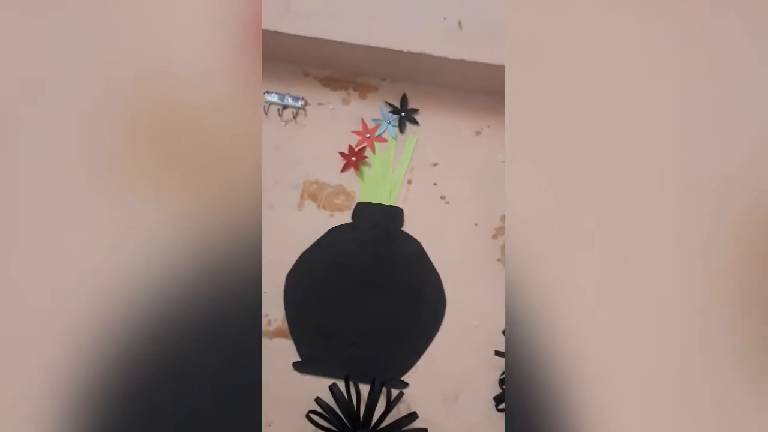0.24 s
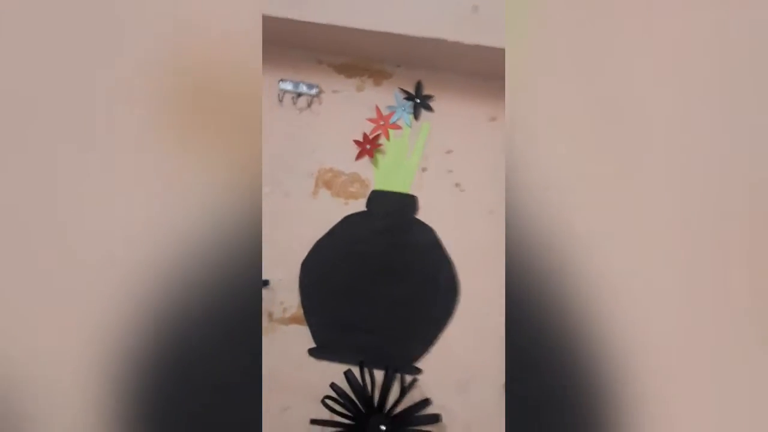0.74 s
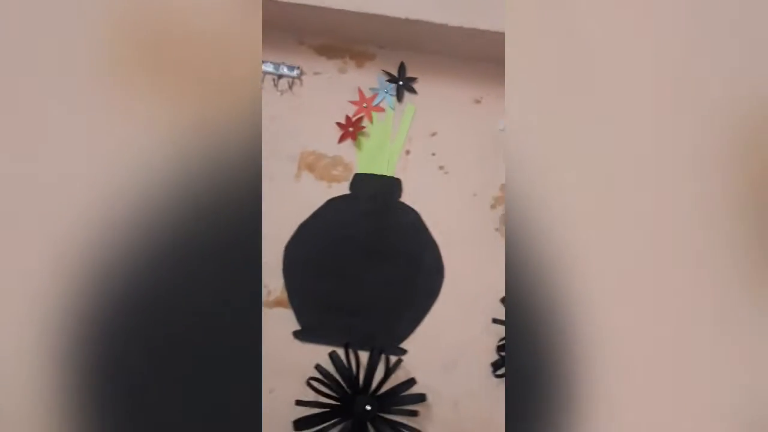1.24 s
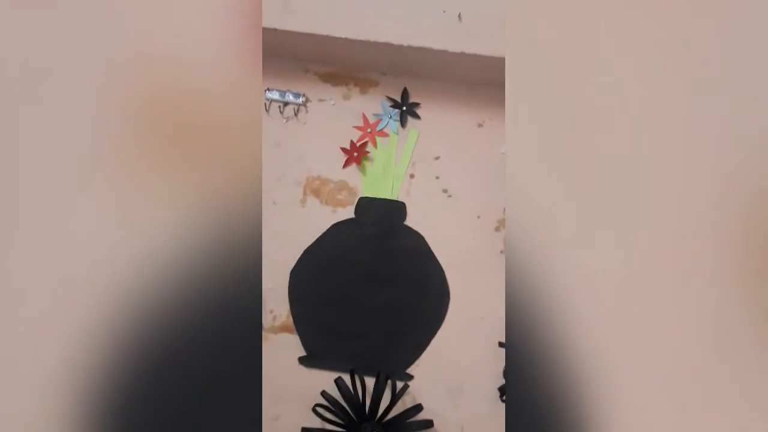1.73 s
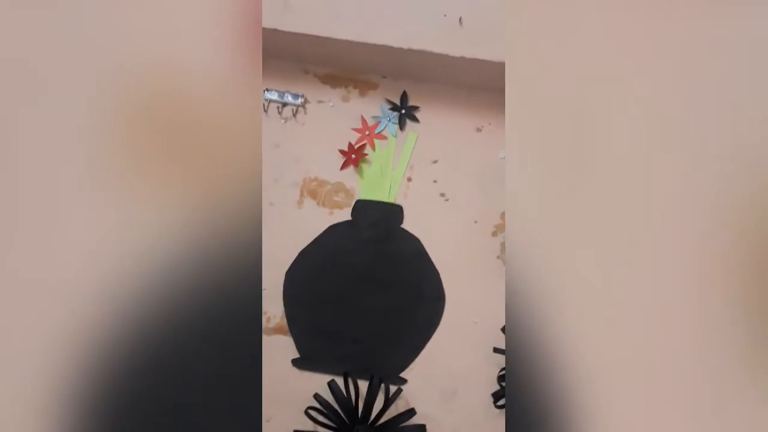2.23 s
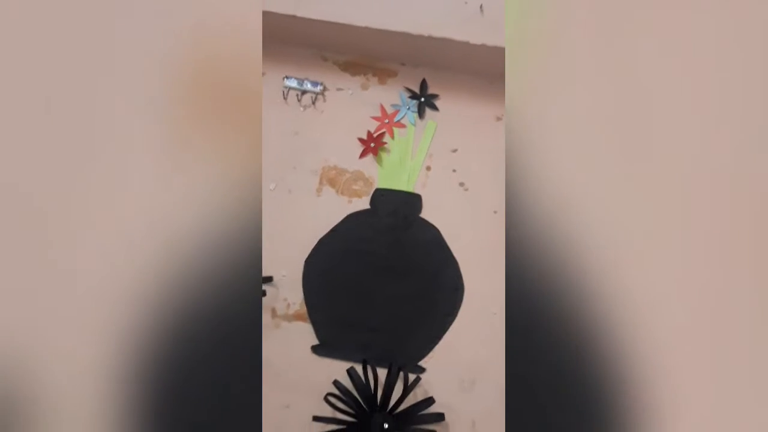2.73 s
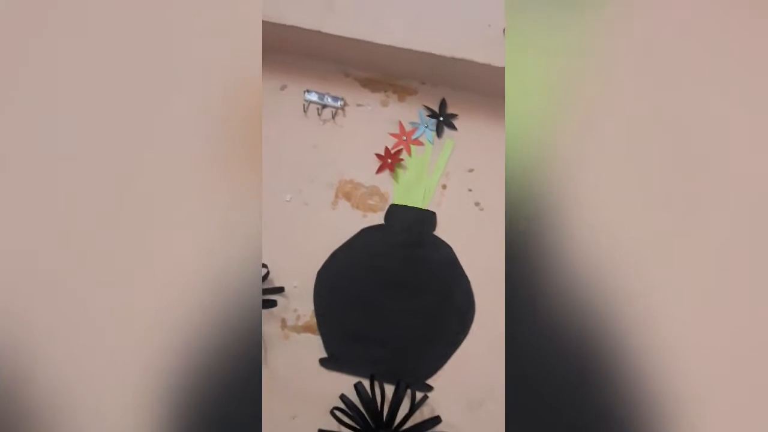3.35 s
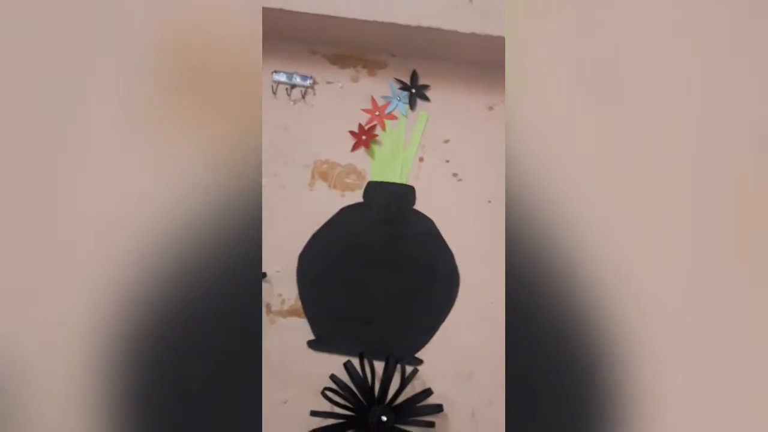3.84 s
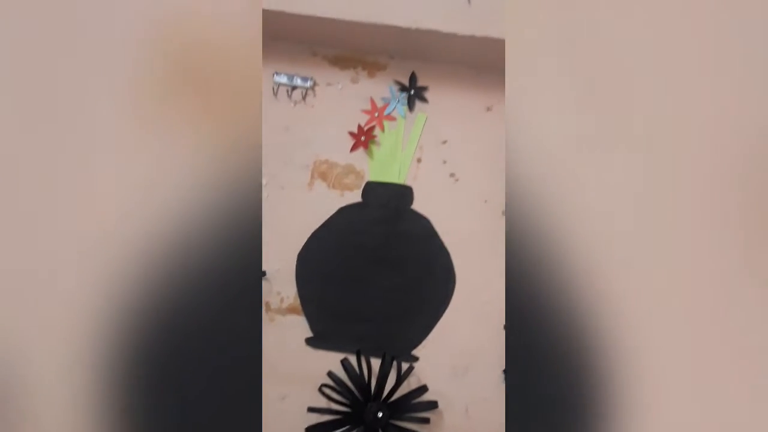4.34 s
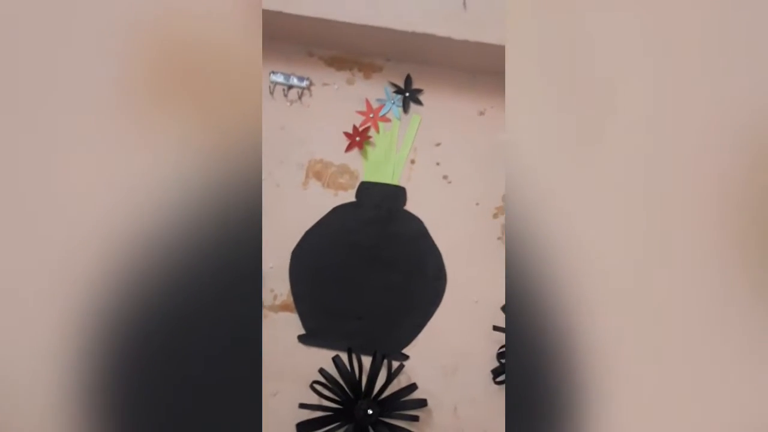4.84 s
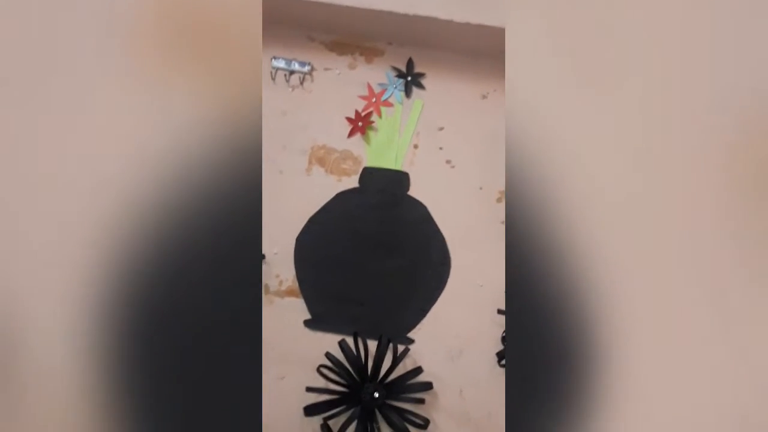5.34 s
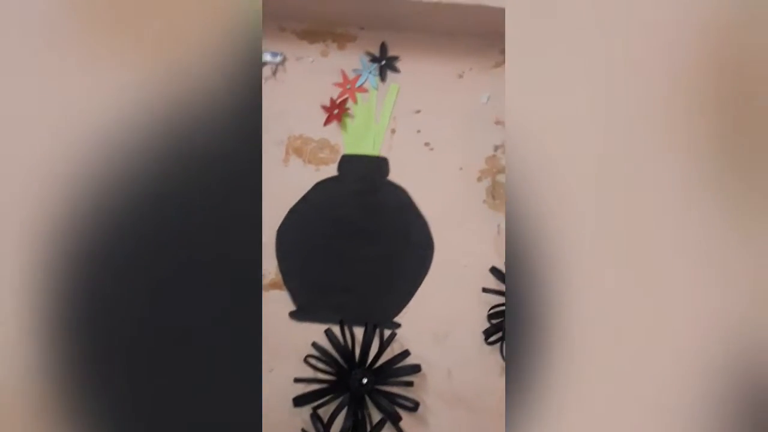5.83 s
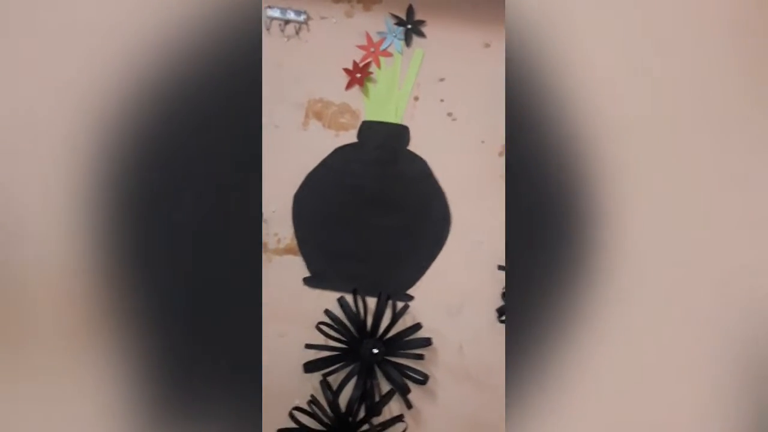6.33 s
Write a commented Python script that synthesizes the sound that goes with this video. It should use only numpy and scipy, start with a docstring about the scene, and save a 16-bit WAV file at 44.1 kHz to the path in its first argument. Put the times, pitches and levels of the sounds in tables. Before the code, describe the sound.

In a quiet room, faint fabric rustling gives way to a click and six loud, close knocks on a hard surface.

```python
"""Six knocks in a bare room

Six sharp knocks hit a hard panel close to a hand-held microphone. Each one cracks, thuds and
sets the small room ringing. Soft swishes, as of cloth, dull bumps and light clicks come mostly before.
The knocks overload the recorder; its gain control turns the room noise down and lets it creep back."""
import sys
import numpy as np
from scipy import signal
from scipy.fft import rfft, irfft
from scipy.io import wavfile
from scipy.ndimage import uniform_filter1d, minimum_filter1d

SR = 44100
rng = np.random.default_rng(int(sys.argv[2]) if len(sys.argv) > 2 else 0)


def master_out(mix):
    """Clip the mix to full scale and print it as 16-bit PCM to the path in sys.argv[1]."""
    frames = np.transpose(np.atleast_2d(mix))
    ceiling = np.clip(frames, -1, 1)
    pcm = np.round(ceiling * 32767).astype(np.int16)
    wavfile.write(sys.argv[1], SR, pcm)


N = 289737
FILTER_HZ = abs(np.fft.fftfreq(8192, 1 / SR))  # the frequencies at which a filter's gain is set
TIME_S = np.arange(SR) / SR  # one second of time, for short sounds

# Tone of the steady room noise: frequency_hz, level_db
ROOM_NOISE_TONE = [(15, -71), (25, -15), (59, -12.5), (92, -0.5), (120, -1.5), (285, -3), (384, -4.5),
                   (416, -4.5), (607, -5.5), (796, -11), (1790, -12), (3340, -5), (6740, -26.5),
                   (8830, -41.5), (16000, -42.5)]
# How long the room takes to fade by 60 dB: frequency_hz, fade_s
ROOM_FADE = [(60, 0.81), (160, 0.47), (420, 0.53), (1100, 0.48), (2900, 0.43), (7700, 0.39), (15000, 0.38)]
# Echoes from the nearest walls: delay_s, level_db
WALL_ECHOES = [(.0105, -19), (.0195, -18), (.0235, -19), (.0405, -22.5)]
# Dull bumps: start_s, level_db, pitch_hz, length_s
DULL_BUMPS = [(.31, -46, 196, 0.13), (.72, -45, 210, 0.063), (1.448, -48, 208.5, .09),
              (1.92, -41.5, 205.6, 0.17), (2.22, -50, 201, 0.13), (6.3, -50, 216.5, .24)]
# Light clicks: start_s, strength_db
LIGHT_CLICKS = [(.409, -26), (.6385, -24), (2.9512, -5), (4.329, -30), (5.956, -35)]
# Tone of a click: frequency_hz, level_db
CLICK_TONE = [(500, -28.5), (2000, -14.5), (3500, -3.5), (6500, -9), (8500, -13.5), (15000, -4.5)]
# Cloth strokes: start_s, swell_s, linger_s, level_db, extra_rustle_db, extra_sheen_db
CLOTH_STROKES = [(0.084, 0.075, 0.066, -36.5, -1, -1), (.335, 0.04, 0.037, -49, -31, 1.5),
                 (.44, .05, .05, -57, 5, -8), (.72, 0.047, .02, -51, -4, -2),
                 (.835, 0.073, 0.14, -32.5, -7.5, -8), (.96, 0.093, 0.05, -32.5, 1, -13),
                 (1.48, 0.13, 0.13, -34.5, -4, -12), (1.72, 0.19, 0.15, -42, 1.5, -7),
                 (1.95, 0.064, 0.013, -35, 2, -11), (2.12, 0.049, .06, -57, -13, -4),
                 (2.785, 0.088, .015, -50.5, -2, -3), (4.34, 0.071, .05, -44.5, 1, -9),
                 (4.57, 0.064, 0.039, -40.5, 1.5, -6), (5.29, 0.068, .12, -53, -1, -4),
                 (5.54, 0.036, .04, -59, -3, -3), (5.86, 0.11, 0.087, -60, -6, -8),
                 (6.392, 0.38, .05, -27, 2.5, -5.5)]
# Tone of the cloth's hiss: frequency_hz, level_db
HISS_TONE = [(1500, -16.5), (2500, -22.5), (3400, 2.5), (4300, 0.5), (5200, -3), (7000, -1.5),
             (8200, -17.5), (16000, -14.5)]
# Tone of its lower rustle: frequency_hz, level_db
RUSTLE_TONE = [(300, -9.5), (900, -18), (1500, -15), (2200, -4), (3200, 2.5), (4200, -5.5), (7000, -29.5)]
# Tone of its high sheen: frequency_hz, level_db
SHEEN_TONE = [(5000, -23.5), (7500, 0.5), (9000, -5), (12500, 3.5), (16000, -6.5)]
# Tone of a knock's crack: frequency_hz, level_db
CRACK_TONE = [(200, -50.5), (1000, -4.5), (1600, -12), (2400, -5.5), (3000, 2.5), (4200, -3), (5500, 1),
              (7000, 0.5), (8200, -14.5), (16000, -17.5)]
# Tone of a knock's reverb: frequency_hz, level_db
REVERB_TONE = [(35, -25), (75, -2.5), (150, 10.5), (300, 10.5), (560, -1.5), (850, 2), (1300, -5),
               (2200, -3.5), (3000, -1.5), (5000, -8), (6900, -4.5), (8200, -19.5), (12000, -21),
               (15500, -25)]
# Notes at which the panel and room ring: pitch_hz, strength_db, fade_s (to fall 60 dB), build_s
RINGING_NOTES = [(57.7, -13.5, 0.31, 0.064), (83.3, -0.5, 0.2, 0.15), (100.5, -6, 0.23, 0.097),
                 (139.6, -1.5, 0.29, 0.017), (161, 2.5, 0.26, 0.036), (192.2, 5.5, 0.32, 0.01),
                 (204.8, 1.5, 0.29, 0.022), (240.2, 0, 0.46, 0.0055), (330.8, -6.5, 0.25, 0.0081),
                 (359.1, -4.5, 0.33, 0.0074), (428.8, -8.5, 0.39, 0.019), (494, -23.5, 0.28, 0.0048),
                 (569, -18, 0.4, 0.0057), (629, -11.5, 0.39, 0.0043), (684, -13, 0.37, 0.0032),
                 (1012, -18.5, 0.61, 0.0019), (2242, -14.5, 0.31, 0.0041)]
# Blows on the panel, each with a second touch: start_s, force_db, snap_db, bass_db, boom_db, mid_db,
# top_db, thud_hz, treble_hz, treble_db, again_s, again_db
BLOWS = [(3.3556, 1.5, -9, 2, -22, 4.5, 2.5, 580, 4230, 2.5, .003, -14),
         (3.7279, -4, 4, 0.5, 5, -1.5, -5.5, 596, 4300, -1.5, .0018, -24),
         (4.0723, -0.5, 2, -2, 3.5, -0.5, 3, 540, 5660, -0.5, .0018, -13),
         (4.424, -2.5, 3.5, -0.5, 2.5, -2.5, 1, 495, 6530, -3.5, .002, -8),
         (4.744, 1.5, 3.5, -4.5, 0.5, -4.5, -1, 470, 5760, -2.5, .0019, -11.5),
         (5.0697, 1.5, 1.5, -2, 4, -3.5, -1.5, 454, 3660, 2.5, .0021, -8)]


def amp(db):
    """Turns decibels into a gain."""
    return 10 ** (np.asarray(db) / 20)


def evened(x):
    """Scales a sound to an average power of 1."""
    return x / np.sqrt(np.mean(x ** 2) + 1e-20)


def curve(points, hz):
    """Reads between a table's points, on straight lines over log frequency."""
    point_hz, value = np.transpose(points)
    return np.interp(np.log(hz + 1), np.log(point_hz + 1), value)


def hump(hz, centre_hz, octaves):
    """A bell shape of height 1 around one frequency."""
    return np.exp(-.5 * (np.log2((hz + 1) / centre_hz) / octaves) ** 2)


def add(mix, start_s, sound):
    """Mixes a sound in at the given time."""
    part = mix[max(round(start_s * SR), 0):][:len(sound)]
    part += sound[:len(part)]


def colour(x, gain_db):
    """Changes the tone by the gains at FILTER_HZ; nothing rings ahead of the sound."""
    response = np.exp(np.conj(signal.hilbert(np.log(amp(gain_db)))))
    taps = np.fft.ifft(response).real
    return signal.fftconvolve(x, taps[:len(taps) // 2])[:len(x)]


def noise(tone):
    """Steady noise with the given tone and a power of 1."""
    gain = amp(curve(tone, np.fft.rfftfreq(N, 1 / SR)))
    return evened(irfft(rfft(rng.standard_normal(N)) * gain, N))


def room_noise(level_db=-46):
    """The room's quiet, steady rush."""
    return amp(level_db) * noise(ROOM_NOISE_TONE)


def reverb(build_s=0.0077, bass_build_s=0.018, bass_hz=170):
    """Countless echoes build up, the bass slowest, and each band fades at its own pace."""
    hz, t, bands = signal.stft(rng.standard_normal(SR), SR, nperseg=512)
    rise_s = build_s + bass_build_s / (1 + (hz[:, None] / bass_hz) ** 2)
    swell = (1 - np.exp(-t / rise_s)) * np.exp(2 * np.pi * rise_s)
    fade = amp(-60 * t / curve(ROOM_FADE, hz)[:, None])
    tail = signal.istft(bands * swell * fade, SR, nperseg=512)[1][:SR]
    return tail / np.linalg.norm(tail)


def echoed(x, walls_db):
    """A sound and its first echoes off the walls."""
    out = x.copy()
    for delay_s, level_db in WALL_ECHOES:
        add(out, delay_s, amp(level_db + walls_db) * x)
    return out


def bumps():
    """Soft pushes, each swelling and fading on one low note."""
    out = np.zeros(N)
    for start_s, level_db, pitch_hz, length_s in DULL_BUMPS:
        t = TIME_S[TIME_S < length_s]
        swell = np.sin(np.pi * t / length_s) ** 2
        add(out, start_s, amp(level_db) * swell * np.sin(2 * np.pi * pitch_hz * t))
    return out


def contact(decay_s, chatter):
    """Two hard things meet: a tick, then a tiny burst of chatter."""
    burst = rng.choice([-1., 1.], SR) * np.exp(-TIME_S / decay_s)
    burst *= chatter / np.linalg.norm(burst)
    burst[0] = 1  # the tick
    return burst / np.linalg.norm(burst)


def clicks(bounce_s=0.0027, bounce_db=-8, boost_db=9, reverb_db=-5):
    """Light clicks, each with one bounce and a little room sound."""
    out = np.zeros(N)
    for start_s, strength_db in LIGHT_CLICKS:
        tick = contact(decay_s=.0008, chatter=1.5)
        add(tick, bounce_s, amp(bounce_db) * contact(decay_s=0.00076, chatter=1.4))
        in_room = echoed(tick, walls_db=-4) + amp(reverb_db) * reverb()
        add(out, start_s, amp(strength_db + boost_db) * colour(in_room, curve(CLICK_TONE, FILTER_HZ)))
    return out


def stroke(since_s, swell_s, linger_s, fade_db_per_s=152):
    """The loudness of one cloth stroke: it swells, lingers and dies away with the room."""
    after_s = np.maximum(since_s - swell_s, 0)
    swell = np.sin(np.pi / 2 * np.clip(since_s / swell_s, 0, 1)) ** 2
    return swell * amp(-fade_db_per_s * (np.hypot(after_s, linger_s) - linger_s))


def swishes(rustle_db=-3, hiss_db=2, sheen_db=-2, grain_db=1, darken_db_per_s=21):
    """Sliding cloth: a slightly grainy hiss with a lower rustle under it and a sheen on top."""
    t = np.arange(N) / SR
    hiss, rustle, sheen = amp([-56.5, -56.5, -69])  # the cloth is never quite still
    for start_s, swell_s, linger_s, level_db, extra_rustle_db, extra_sheen_db in CLOTH_STROKES:
        gain = amp(level_db) * stroke(t - start_s, swell_s, linger_s)
        # the rustle gains on the hiss as the stroke goes on
        darker_db = darken_db_per_s * np.clip(t - start_s - swell_s, -.5, .5)
        hiss = np.hypot(hiss, gain)  # overlapping strokes add in power
        rustle = np.hypot(rustle, gain * amp(extra_rustle_db + darker_db))
        sheen = np.hypot(sheen, gain * amp(extra_sheen_db))
    cloth = amp(hiss_db) * hiss * noise(HISS_TONE)
    cloth += amp(rustle_db) * rustle * noise(RUSTLE_TONE)
    cloth += amp(sheen_db) * sheen * noise(SHEEN_TONE)
    flutter = evened(uniform_filter1d(rng.standard_normal(N), size=150))
    return cloth * amp(grain_db * flutter)


def ring(pitch_hz, fade_s):
    """One note that dies away by 60 dB in fade_s."""
    return amp(-60 * TIME_S / fade_s) * np.sin(2 * np.pi * pitch_hz * TIME_S)


def standing_waves():
    """The panel's and room's own notes swell, then die; the slow ones gather more energy."""
    out = np.zeros(SR)
    for pitch_hz, strength_db, fade_s, build_s in RINGING_NOTES:
        swell = (1 - np.exp(-TIME_S / build_s)) ** 2 * np.exp(build_s * 22)
        out += amp(strength_db) * swell * ring(pitch_hz, fade_s)
    return out


def doubled(x, delay_s, repeat_db):
    """A sound and its quick repeat, which puts ripples in its tone."""
    out = x.copy()
    add(out, delay_s, amp(repeat_db) * x)
    return out / np.hypot(1, amp(repeat_db))


def hollow(thud_hz, peak_db=4, dip_db=-5, dip_ratio=1.74):
    """The panel's tone in dB: it sounds best at its hollow note and poorly just above it."""
    peak = peak_db * hump(FILTER_HZ, thud_hz, octaves=0.26)
    return peak + dip_db * hump(FILTER_HZ, thud_hz * dip_ratio, octaves=0.36)


def thud(pitch_hz, note_db=5, push_db=-4, push_hz=220):
    """The panel gives under the blow: a hollow note and a lower push, both very short."""
    note = amp(note_db) * ring(pitch_hz, fade_s=0.02) * (1 - np.exp(-TIME_S / 0.0018))
    push = amp(push_db) * ring(push_hz, fade_s=0.018)
    return signal.sosfilt(signal.butter(1, 150, "highpass", fs=SR, output="sos"), note + push)


def crack(thud_hz, again_s, again_db, boost_db=24):
    """The sharp start of a knock: the blow touches the panel twice within a moment."""
    touches = contact(decay_s=0.0021, chatter=2.1)
    add(touches, again_s, amp(again_db) * contact(decay_s=0.006, chatter=3.2))
    tone_db = curve(CRACK_TONE, FILTER_HZ) + hollow(thud_hz, peak_db=6.5, dip_db=-14.5, dip_ratio=1.1)
    return amp(boost_db) * colour(touches, tone_db)


def knocks(reverb_db=27, ringing_db=-10, accent_db=5, ripple_db=-6, alike=0.87):
    """Each blow cracks, thuds into the panel and sets the room ringing."""
    out = np.zeros(N)
    shared_tail = reverb()
    ringing = amp(ringing_db) * standing_waves()
    for (start_s, force_db, snap_db, bass_db, boom_db, mid_db,
         top_db, thud_hz, treble_hz, treble_db, again_s, again_db) in BLOWS:
        # the spot that is struck favours its own highs and lows
        bright_db = (accent_db + treble_db) * hump(FILTER_HZ, treble_hz, octaves=0.27)
        bright_db += mid_db * hump(FILTER_HZ, 1610, octaves=0.42)
        bright_db += top_db * hump(FILTER_HZ, 12000, octaves=1.0)
        body_db = hollow(thud_hz) + bass_db * hump(FILTER_HZ, 172, octaves=0.25)
        body_db += boom_db * hump(FILTER_HZ, 72.7, octaves=0.32)
        hit = amp(snap_db) * echoed(crack(thud_hz, again_s, again_db), walls_db=-0.5)
        hit += amp(0.77 * snap_db) * echoed(thud(thud_hz), walls_db=5)  # walls return low notes best
        tail = alike * shared_tail + np.sqrt(1 - alike ** 2) * reverb()
        tail = doubled(tail, again_s, again_db + ripple_db)
        tail = amp(reverb_db) * colour(tail, curve(REVERB_TONE, FILTER_HZ))
        room = colour(tail + ringing, body_db)
        add(out, start_s, amp(force_db) * colour(hit + room, bright_db))
    return out


def scene():
    """All the sounds meet at one microphone."""
    return (knocks() + swishes() + clicks() + bumps() + room_noise())[None]


def record(dry, threshold_db=-24, slope=0.38, start_db=4, deepest_db=10,
           attack_s=0.19, hold_s=0.53, recover_db_per_s=10, cutoff_hz=16050):
    """The gain starts a bit low, drops on loud sounds, holds, recovers; peaks clip; top treble is cut."""
    power = uniform_filter1d(dry[0] ** 2, size=900, origin=449)  # over the last 20 ms
    power_db = 10 * np.log10(abs(power) + 1e-12)
    half_hold = int(hold_s * SR / 2)
    loudest_db = -minimum_filter1d(-power_db, size=2 * half_hold + 1, origin=half_hold, mode="nearest")
    wanted_db = slope * (loudest_db - threshold_db)  # how far to turn down
    recovery_db = recover_db_per_s * np.arange(N) / SR
    held_db = np.maximum.accumulate(np.maximum(wanted_db + recovery_db, start_db)) - recovery_db
    lag = np.exp(-1 / (attack_s * SR))
    cut_db = signal.lfilter([1 - lag], [1, -lag], np.clip(held_db, 0, deepest_db), zi=[start_db])[0]
    clipped = np.clip(dry / amp(cut_db), -1, 1)
    lowpass = signal.firwin(511, cutoff_hz, window=("kaiser", 9), fs=SR)
    return signal.oaconvolve(clipped, lowpass[None], "same")


dry = scene()
out = record(dry)
master_out(out)
```